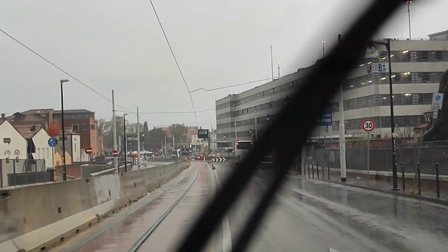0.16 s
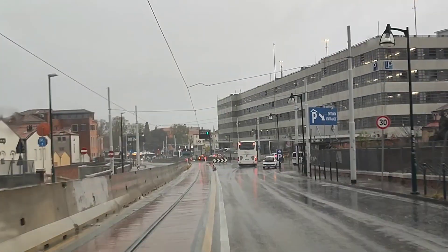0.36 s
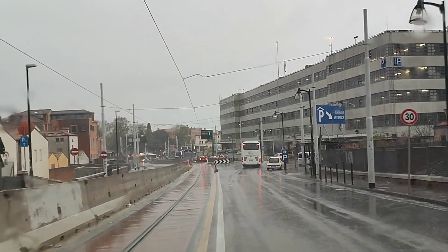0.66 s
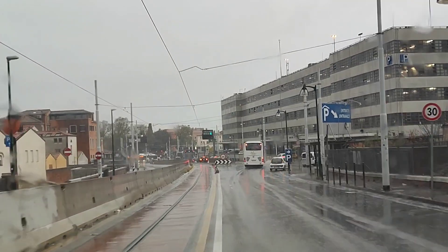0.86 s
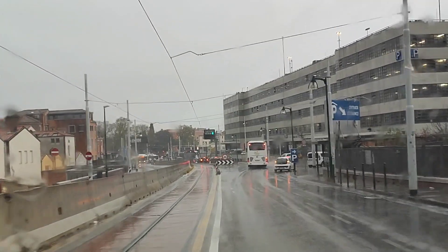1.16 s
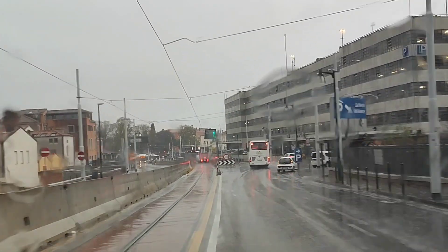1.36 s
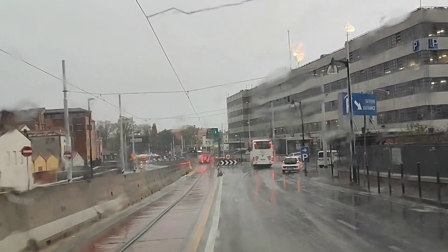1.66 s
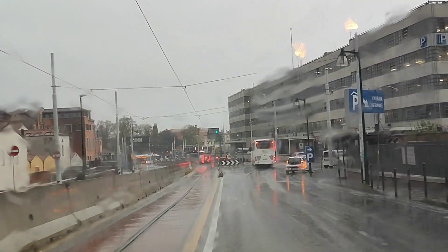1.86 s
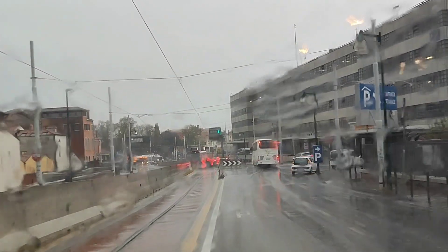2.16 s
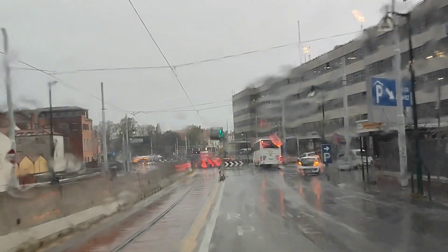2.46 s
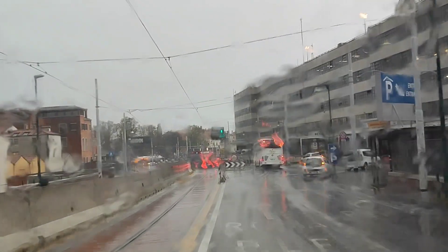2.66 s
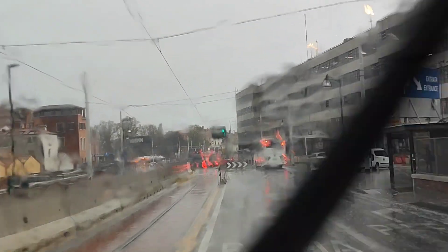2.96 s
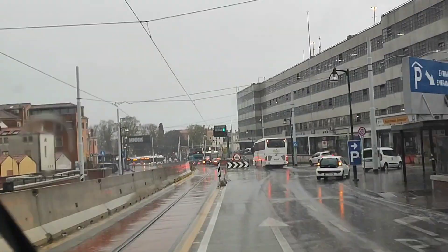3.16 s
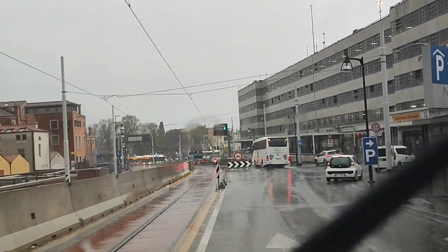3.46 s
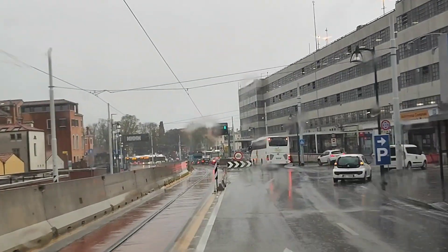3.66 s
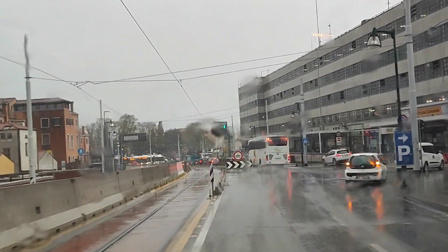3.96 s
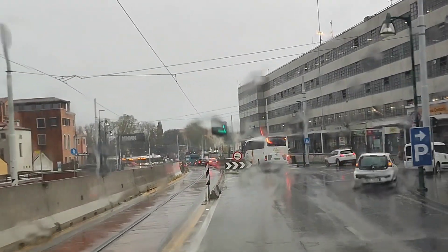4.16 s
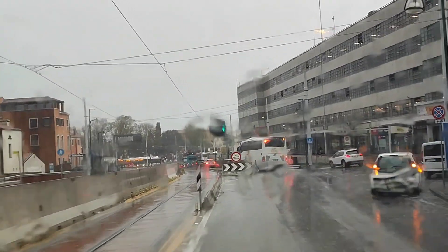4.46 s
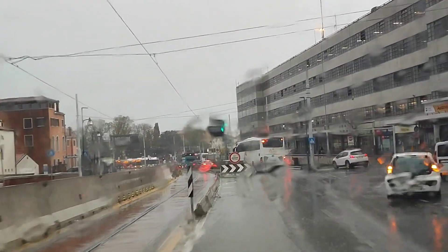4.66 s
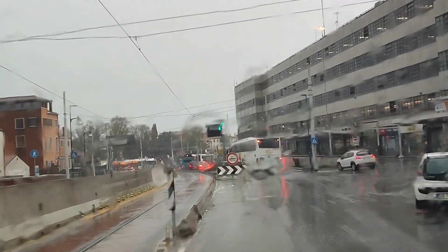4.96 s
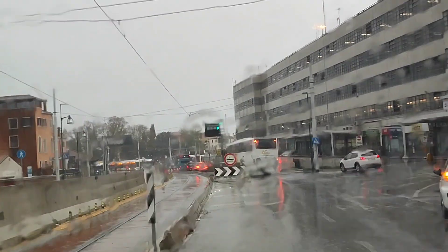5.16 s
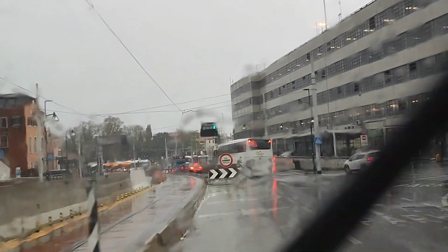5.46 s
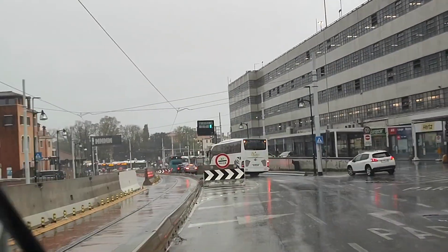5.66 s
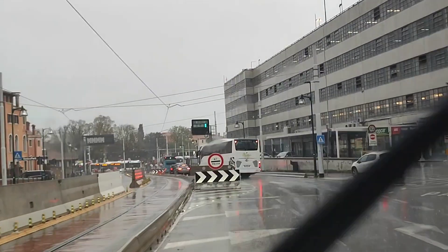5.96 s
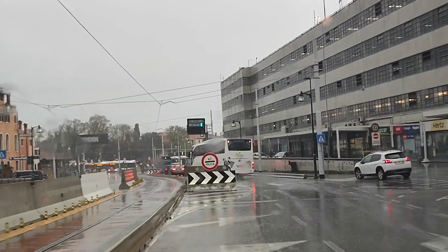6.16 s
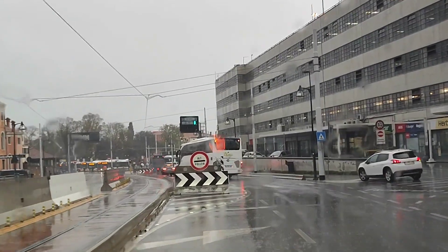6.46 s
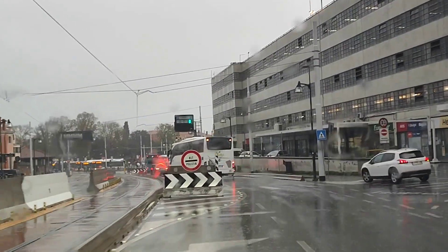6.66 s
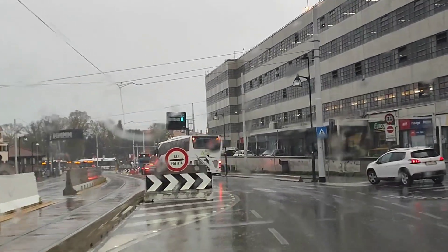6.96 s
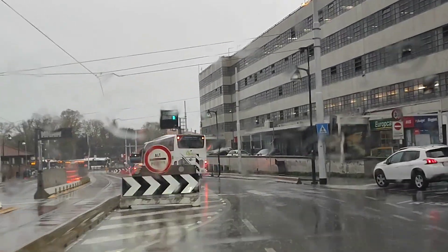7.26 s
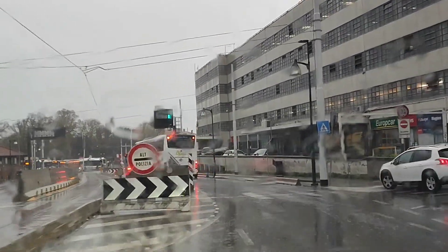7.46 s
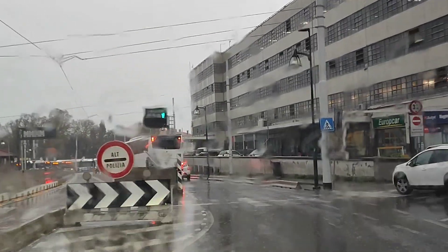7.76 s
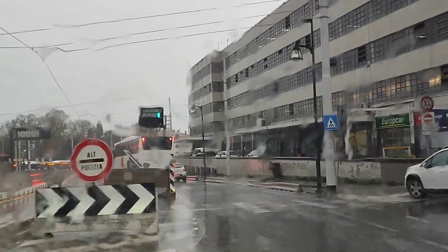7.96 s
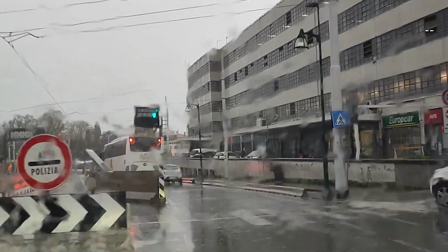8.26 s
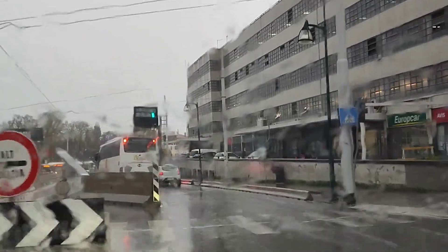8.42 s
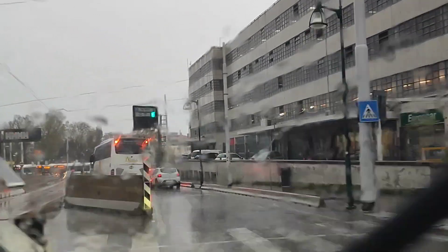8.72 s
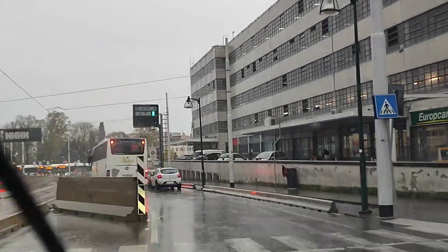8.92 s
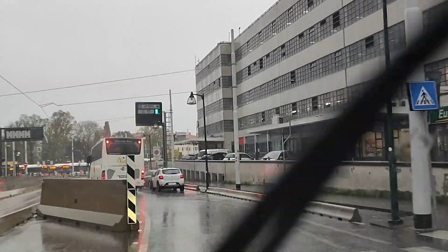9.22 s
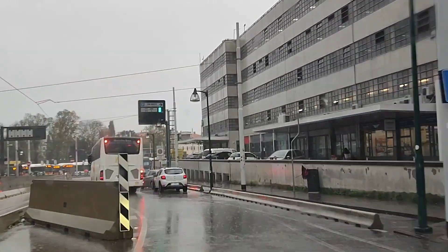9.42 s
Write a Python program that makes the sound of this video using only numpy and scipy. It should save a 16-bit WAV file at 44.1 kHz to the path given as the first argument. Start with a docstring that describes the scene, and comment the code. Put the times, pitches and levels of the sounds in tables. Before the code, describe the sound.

From inside a car rolling slowly through a downpour, sheets of drops tick sharply on the windscreen. Heavy drops crack out in quick clusters, loudest a little to the left about three seconds in; after the midpoint the patter turns lighter and comes in waves. The wipers swish softly a few times, and muffled rain on the roof and a quiet tyre and engine rumble stay beneath.

```python
"""Inside a slowly moving car, with heavy rain on the windscreen.
Sheets of drops tick on the glass, which rings most strongly near 3 kHz; fat drops snap out singly
and in short volleys. Harder rain makes the patter louder, sharper and slightly denser.
Under it lie dull taps and a wash of rain on the bodywork, soft wiper strokes,
a low road rumble and a faint hiss."""
import sys
import numpy as np
from scipy import signal
from scipy.fft import rfft, irfft, next_fast_len
from scipy.io import wavfile
from scipy.ndimage import map_coordinates

SR = 44100
rng = np.random.default_rng(int(sys.argv[2]) if len(sys.argv) > 2 else 0)


def master_out(mix):
    """Clip the mix to full scale and print it as 16-bit PCM to the path in sys.argv[1]."""
    frames = np.transpose(np.atleast_2d(mix))
    ceiling = np.clip(frames, -1, 1)
    pcm = np.round(ceiling * 32767).astype(np.int16)
    wavfile.write(sys.argv[1], SR, pcm)


N = 422919

# The tone of a drop heard through the glass. Each row: frequency in Hz, relative level in dB.
GLASS_TONE = [(40, -87), (200, -59), (700, -30.5), (1400, -21), (2000, -12), (2500, -5), (2800, 0.5),
              (3050, 4.5), (3300, 0), (3560, -1), (3830, -5.5), (4350, -7.5), (5100, -16), (5900, -17.5),
              (6800, -24), (7700, -34.5), (9000, -36), (10500, -44.5), (12000, -47.5), (16000, -53)]
RING_HZ, RING_HALF_WIDTH_HZ = 3000, 350  # where the glass rings most strongly


def windscreen():
    """Thicker sheets of rain are louder, denser and sharper; the finest spray merges into a hiss."""
    # How hard the rain hits. Each row: time in seconds, strength in dB.
    rain_strength = [(0.0, -37), (0.18, -37), (0.3, -40), (0.39, -37), (0.46, -31.5), (0.68, -33.5),
                     (0.77, -35), (0.86, -36), (1.0, -31.5), (1.4, -31), (1.7, -33.5), (1.88, -34),
                     (1.96, -36.5), (2.06, -40), (2.18, -34.5), (2.48, -34.5), (2.6, -32), (2.77, -33.5),
                     (2.88, -35), (2.96, -30.5), (3.2, -34), (3.42, -35), (3.56, -37), (3.72, -37),
                     (3.86, -32), (4.2, -32.5), (4.31, -32.5), (4.38, -31), (4.52, -37.5), (4.62, -38),
                     (4.72, -41.5), (5.2, -42), (5.34, -39), (5.42, -36.5), (5.56, -33), (5.7, -36.5),
                     (5.9, -40.5), (6.08, -35), (6.22, -38.5), (6.32, -35.5), (6.45, -38), (6.51, -39.5),
                     (6.82, -44.5), (6.92, -40.5), (7.1, -35), (7.22, -39), (7.6, -34), (7.9, -40),
                     (8.02, -39), (8.32, -36.5), (8.47, -39.5), (8.58, -43.5), (8.68, -38.5), (8.76, -37),
                     (8.9, -41), (9.18, -36.5), (9.42, -36.5), (9.58, -35)]
    drops_per_s, flurries_per_s = 1700, 12
    rain_db, = curves(rain_strength)
    swell_db = rain_db - rain_db.mean()
    density = amp(0.05 * swell_db)
    ticks = patter(rate=drops_per_s * density, scatter_db=5.5, spread_db=15.5, largest=1.84)
    ticks = unit(ticks / np.sqrt(density))  # extra drops alone add no loudness
    ticks = unit(ticks + amp(-10) * cabin_noise(GLASS_TONE))  # add the fine spray
    # chance flurries nudge the treble, the side and the level
    treble_db = -2.1 + 0.38 * swell_db + 0.83 * wobble(flurries_per_s)
    pan_db = 0.85 + 0.8 * wobble(flurries_per_s)
    level_db = rain_db - 2.5 + 0.05 * wobble(flurries_per_s)
    ticks = ticks + (amp(treble_db) - 1) * filtered(ticks, treble)
    return ticks * amp(level_db) * sides(pan_db)


def patter(rate, scatter_db, spread_db, largest, spots=48):
    """Drops of random size, rate a second, land on many spots that each ring their own way."""
    glass = np.zeros((2, N))
    for place in np.linspace(-1, 1, spots):
        ring = impact(edge_db=0.5, cabin_db=0.5, cabin_fade_s=0.041, bright_db=rng.normal(-0.9, 6.0),
                      ring_hz=RING_HZ * np.exp(0.02 * rng.standard_normal()), ring_db=0)
        lands = rng.random(N) < rate / (spots * SR)
        sizes = np.minimum(rng.standard_normal(N)[lands], largest)  # bigger drops break up
        hits = np.zeros(N)
        hits[lands] = amp(scatter_db * sizes)
        glass += signal.oaconvolve(hits[None], unit(ring) * sides(spread_db * place), axes=1)[:, :N]
    return unit(glass)


def impact(edge_db, cabin_db, cabin_fade_s, bright_db, ring_hz, ring_db, size=4096):
    """One drop bends the glass: a wave runs out and bounces off the frame, then the cabin echoes."""
    t, hz = np.arange(size) / SR, np.fft.rfftfreq(size, 1 / SR)
    # higher waves run faster, matching sound in air (343 m/s) at the ring of the glass
    radians_per_m = 2 * np.pi * np.sqrt(hz * RING_HZ) / 343
    wave = lambda near_m, far_m: np.exp(-1j * radians_per_m * rng.uniform(near_m, far_m, (2, 1)))
    bending = wave(0.2, 0.5) + amp(edge_db) * (wave(0.5, 0.9) + wave(0.8, 1.5) / 2)
    echoes = rng.standard_normal((2, size)) * amp(-60 * t / cabin_fade_s) * (1 - np.exp(-t / 0.0016))
    # each spot rings a little higher or lower, and longer under a heavy drop
    tone_db = along(GLASS_TONE, hz * RING_HZ / ring_hz)
    tone_db += bright_db * treble(hz, low_hz=4740, high_hz=7250)
    tone_db += ring_db * ring_band(hz, ring_hz)
    spectrum = (bending + amp(cabin_db) * unit(rfft(echoes))) * struck_filter(tone_db)
    return irfft(spectrum) * (1 - t / t[-1])


def fat_drops():
    """Single heavy drops snap on the glass, each with its own ring and hardness."""
    # Each row: start in seconds, level in dB, left over right in dB,
    # treble share in dB before the extra crack, ring in Hz.
    drops = [(0.14, -30, 2, -16, 3030), (0.43, -30, -2, -16, 3000), (0.435, -26, -3, -13, 2910),
             (0.458, -28, 0, -16, 3160), (0.504, -21, 4, -14, 3030), (0.517, -25, 2, -11, 3100),
             (0.566, -27, 1, -15, 3060), (0.589, -26, -2, -13, 3050), (0.598, -28, 3, -14, 3110),
             (0.647, -21, -5, -16, 3100), (0.703, -30, -13, -21, 3330), (0.79, -27, 0, -18, 3020),
             (0.816, -32, 5, -18, 3230), (0.89, -23, -5, -17, 2970), (0.982, -26, 5, -12, 3130),
             (1.044, -25, 4, -11, 3080), (1.175, -26, 4, -16, 3100), (1.215, -27, 4, -20, 3080),
             (1.275, -27, 1, -15, 3090), (1.806, -29, -8, -16, 2920), (1.871, -29, 4, -16, 3030),
             (1.935, -28, 0, -23, 3080), (2.09, -29, -1, -15, 3060), (2.101, -33, -4, -19, 3080),
             (2.125, -29, -3, -26, 2860), (2.151, -27, 2, -17, 3040), (2.282, -28, 4, -25, 2960),
             (2.374, -25, 6, -21, 3380), (2.48, -29, 14, -22, 3160), (2.506, -24, 9, -10, 3080),
             (2.525, -21, 9, -20, 3010), (2.561, -20, 8, -8, 2970), (2.578, -19, 11, -13, 3110),
             (2.59, -18, 9, -16, 3080), (2.625, -25, 18, -14, 3150), (2.639, -32, 13, -3, 2860),
             (2.648, -22, 14, -17, 3180), (2.677, -16, 14, -20, 3260), (2.809, -24, 8, -18, 3080),
             (2.828, -27, 11, -12, 3030), (2.84, -27, 12, -21, 3200), (2.847, -19, 9, -21, 3190),
             (2.952, -22, 11, -27, 2980), (2.958, -24, 10, -15, 3090), (2.996, -18, 13, -7, 3110),
             (3.017, -21, 11, -19, 3150), (3.038, -26, 9, -20, 3120), (3.051, -22, 10, -18, 3000),
             (3.121, -25, 11, -19, 2960), (3.645, -32, 14, -29, 2980), (3.698, -28, -5, -20, 3070),
             (3.78, -29, 11, -22, 3020), (4.017, -26, -5, -19, 2980), (4.025, -28, 7, -14, 3100),
             (4.139, -22, 8, -13, 3040), (4.156, -22, 11, -14, 3020), (4.211, -25, 10, -14, 2840),
             (4.336, -28, 10, -17, 3450), (4.365, -25, 8, -20, 3200), (4.391, -30, 5, -20, 3060),
             (4.66, -34, 12, -15, 2940), (4.736, -38, 5, -23, 3020), (4.769, -36, -11, -22, 2950),
             (4.845, -35, -8, -26, 2930), (4.904, -37, -1, -17, 3140), (5.361, -36, 7, -15, 2940),
             (5.417, -29, 11, -18, 3190), (5.571, -33, 5, -18, 3170), (5.661, -30, 12, -22, 3180),
             (5.723, -30, 4, -15, 3080), (5.802, -34, 5, -10, 3040), (5.845, -34, 3, -19, 2950),
             (5.954, -31, 8, -15, 3120), (6.299, -28, 1, -18, 3160), (6.42, -34, -2, -17, 2950),
             (6.471, -25, 24, -21, 3240), (6.866, -37, -14, -23, 3000), (6.87, -37, -18, -23, 3010),
             (6.905, -34, -3, -27, 3030), (6.965, -33, -3, -23, 3010), (6.982, -34, 2, -29, 3030),
             (7.175, -30, 3, -22, 3050), (7.288, -32, -8, -27, 3000), (7.372, -32, 2, -19, 3090),
             (7.466, -30, 8, -18, 3060), (7.507, -30, -4, -20, 2970), (7.806, -33, -11, -22, 3050),
             (7.892, -35, 4, -19, 3230), (8.012, -35, -3, -18, 3000), (8.082, -32, -3, -24, 3010),
             (8.175, -32, 0, -14, 3310), (8.227, -30, 4, -22, 2980), (8.416, -35, -4, -19, 3100),
             (8.648, -35, 0, -23, 3070), (8.694, -33, -7, -17, 3000), (8.748, -40, -4, -7, 3160),
             (8.764, -26, 0, -13, 3030), (8.78, -32, -1, -15, 3000), (8.83, -33, 4, -23, 3070),
             (8.85, -35, -1, -25, 2930), (8.885, -34, 4, -23, 3040), (8.941, -34, 2, -23, 3080),
             (9.134, -33, 11, -6, 3070), (9.15, -34, 2, -25, 3040), (9.169, -32, -1, -21, 3080)]
    snap_s, crack_db, contact_hz = 0.0013, 0.95, 2090
    out = np.zeros((2, N + SR))
    for start, db, pan_db, treble_db, ring_hz in drops:
        plain = impact(edge_db=-8, cabin_db=-6, cabin_fade_s=0.028, bright_db=0,
                       ring_hz=ring_hz, ring_db=5.5)
        snap = np.array([hardened(ear, treble_db + crack_db) for ear in plain])
        strength = np.sqrt(np.sum(snap ** 2, axis=1, keepdims=True) / (snap_s * SR))
        out[:, round(start * SR):][:, :snap.shape[1]] += amp(db) * sides(pan_db) * snap / strength
    # a small hard contact makes few low tones
    return filtered(out[:, :N], lambda hz: -hz ** 2 / (contact_hz ** 2 + 1j * contact_hz * hz - hz ** 2))


def hardened(plain, treble_db):
    """A hard hit is bright, a soft one dull: move the treble's share of a drop towards treble_db."""
    spectrum = rfft(plain)
    hz = np.linspace(0, SR / 2, len(spectrum))
    for _ in range(3):
        power = np.abs(spectrum) ** 2
        lift_db = treble_db - 10 * np.log10(np.sum(power[hz > 4800]) / np.sum(power))
        spectrum = spectrum * struck_filter(lift_db * treble(hz, low_hz=4200, high_hz=10500))
    return irfft(spectrum)


def volleys():
    """Short bursts of heavy drops rattle on one part of the glass at a time."""
    # Each row: start in seconds, length in seconds, level in dB, left over right in dB,
    # treble lift in dB.
    bursts = [(0.43, 0.16, -39, -2, 5.5), (0.642, 0.048, -40, -8, 2), (0.945, 0.14, -46, 0, 12),
              (1.343, 0.35, -39, 1, -1), (2.592, 0.114, -37, 4, 9), (2.807, 0.058, -37.5, 8, 6),
              (2.93, 0.178, -39.5, 7, 4.5), (4.09, 0.12, -37.5, 5.5, 3), (4.345, 0.055, -36.5, 12, 5),
              (5.394, 0.052, -41, 8, -9), (5.71, 0.1, -46, 7, 7.5), (6.273, 0.22, -42.5, -3.5, 2),
              (7.458, 0.27, -46, -5, 4), (8.744, 0.057, -43, -5, -5), (9.11, 0.066, -40.5, 0, -1)]
    t, edge_s = np.arange(N) / SR, 0.011
    rattle = patter(rate=480, scatter_db=2.0, spread_db=1.0, largest=2.5, spots=24)
    snap = filtered(rattle, treble)
    out = np.zeros((2, N))
    for start, length, db, pan_db, treble_db in bursts:
        fade = np.clip(np.minimum(t - start, start + length - t) / edge_s + 0.5, 0, 1)
        out += amp(db) * sides(pan_db) * fade * (rattle + (amp(treble_db) - 1) * snap)
    return out


def near_pane(glass):
    """The pane sends some pitches left, others right; a little of its ring crosses over upside down."""
    # Each row: frequency in Hz, left over right in dB.
    lean = [(2000, 0.5), (2700, 1.5), (3050, 0.6), (3700, -1), (4400, 3), (5000, -3), (5800, 3), (7000, -1)]
    left, right = filtered(glass, lambda hz: amp(along(lean, hz) * np.array([[1], [-1]]) / 2))
    crossed_ring = filtered(np.array([right, left]), ring_band)
    return np.array([left, right]) - 0.086 * crossed_ring


def roof_taps(size=4096):
    """Heavy drops on the lined roof give short, dull taps."""
    # Each row: start in seconds, level in dB before the boost, left over right in dB.
    taps = [(0.647, -52, 0), (3.699, -54, -2), (3.878, -53, 4), (3.906, -55, -6), (6.084, -64, -1),
            (6.446, -52, 5), (6.936, -59, 1), (7.176, -52, 0), (7.31, -56.5, 0), (8.013, -55.5, 1)]
    # A tap through the lining. Each row: frequency in Hz, relative level in dB.
    tap_tone = [(40, -60), (200, -30), (500, -11), (1000, -4), (1800, 2.5), (3000, -19), (5000, -36)]
    boost_db, fade_s = 9, 0.034
    out = np.zeros((2, N + SR))
    t, hz = np.arange(size) / SR, np.fft.rfftfreq(size, 1 / SR)
    panel = unit(struck_filter(along(tap_tone, hz)))
    for start, db, pan_db in taps:
        splash = amp(db + boost_db - 60 * t / fade_s) * rng.standard_normal((2, size))
        out[:, round(start * SR):][:, :size] += sides(pan_db) * irfft(rfft(splash) * panel)
    return out[:, :N]


def bodywork():
    """Countless drops on roof and bonnet merge into a dull wash that swells slowly."""
    # Each row: time in seconds, level in dB.
    wash_level = [(0, -53.5), (1.0, -51), (1.7, -47), (2.2, -52), (2.9, -52), (3.7, -53.5), (4.25, -48.5),
                  (4.9, -55), (6.2, -50.5), (6.8, -55), (7.6, -50.5), (8.6, -53), (9.59, -53)]
    # Rain through the lined roof. Each row: frequency in Hz, relative level in dB.
    roof_tone = [(30, -46), (120, -39), (300, -10.5), (550, -4), (850, -0.5), (1300, 5), (2000, 9.5),
                 (3000, 10.5), (5000, -20), (9000, -58), (15000, -39)]
    level_db, = curves(wash_level)
    return amp(level_db + 1.04 * wobble(12)) * cabin_noise(roof_tone)


def wipers():
    """Each stroke pushes water over the glass with a soft swish."""
    # Each row: middle of the stroke in seconds, level in dB.
    strokes = [(0.12, -70), (3.3, -62), (5.6, -56), (8.8, -71.5)]
    # Rubber on wet glass. Each row: frequency in Hz, relative level in dB.
    rubber_tone = [(150, -21), (420, 13), (900, 17), (1600, 24.5), (4000, -60)]
    t, half_stroke_s = np.arange(N) / SR, 0.11
    sweep = sum(amp(db) * np.exp(-((t - middle) / half_stroke_s) ** 2) for middle, db in strokes)
    return sweep * cabin_noise(rubber_tone)


def road():
    """Tyres and engine rumble through the floor, wavering a little."""
    # Each row: time in seconds, level in dB.
    rumble_level = [(0, -74.5), (9.59, -75)]
    # Each row: frequency in Hz, relative level in dB.
    rumble_tone = [(25, -44), (60, -26), (105, -11.5), (125, -9.5), (138, -9), (150, -2), (170, -8.5),
                   (225, 4), (340, 3), (500, 5), (900, -3), (2000, -36)]
    level_db, = curves(rumble_level)
    return amp(level_db + wobble(2.55)) * cabin_noise(rumble_tone) * sides(pan_db=2)


def hiss():
    """A faint steady hiss that remains in the lulls."""
    # Each row: frequency in Hz, relative level in dB.
    hiss_tone = [(2000, -19), (5500, 22), (8000, -18), (11000, -1), (15000, -12)]
    return amp(-71) * cabin_noise(hiss_tone)


def cabin_noise(tone):
    """Stereo noise with the given tone and a level of 1, alike on both sides in the bass."""
    # Each row: frequency in Hz, likeness of the two sides (1 the same, -1 opposite).
    likeness = [(40, .6), (160, 1), (330, 0.81), (520, 0.39), (750, -0.06), (1200, -0.35), (1900, 0.14),
                (2800, 0.41), (5000, 0.38)]

    def colour(hz):
        angle = np.arccos(np.clip(along(likeness, hz), -1, 1)) / 2
        return amp(along(tone, hz)) * [np.cos(angle), np.sin(angle)]
    mid, side = filtered(rng.standard_normal((2, N)), colour)
    return unit(np.array([mid + side, mid - side]))


def ring_band(hz, ring_hz=RING_HZ):
    """1 at the ring of the glass, falling to 0 away from it."""
    return 1 / (1 + ((hz - ring_hz) / RING_HALF_WIDTH_HZ) ** 2)


def treble(hz, low_hz=4300, high_hz=7600):
    """Near 1 in the band of a drop's snap, above the ring of the glass; 0 far outside it."""
    return (1 - 1 / (1 + (hz / low_hz) ** 10)) / (1 + (hz / high_hz) ** 8)


def amp(db):
    """Turn decibels into a gain."""
    return 10 ** (np.asarray(db) / 20)


def unit(x):
    """Scale x to an average (rms) level of 1."""
    return x / np.sqrt(np.mean(np.abs(x) ** 2) + 1e-20)


def along(points, hz):
    """Read between (Hz, value) points on a pitch-like (log) scale."""
    frequencies, values = np.transpose(points)
    return np.interp(np.log(hz + 1), np.log(frequencies), values)


def curves(rows):
    """One value per sample for each column after the time."""
    seconds, *columns = np.transpose(rows)
    return [np.interp(np.arange(N) / SR, seconds, column) for column in columns]


def wobble(rate):
    """A smooth curve through rate random points a second."""
    return map_coordinates(rng.standard_normal(int(N * rate / SR) + 4), [np.arange(N) * rate / SR])


def filtered(x, response):
    """Scale each frequency in x by response(hz)."""
    size = next_fast_len(N + SR // 2)
    return irfft(rfft(x, size) * response(np.fft.rfftfreq(size, 1 / SR)), size)[..., :N]


def struck_filter(gain_db):
    """A filter with these gains that rings after a hit, never before it (minimum phase)."""
    cepstrum = irfft(np.log(amp(gain_db)))
    half = len(cepstrum) // 2
    cepstrum[1:half] *= 2
    cepstrum[half + 1:] = 0
    return np.exp(rfft(cepstrum))


def sides(pan_db):
    """Left and right gains with the same total power; positive pan_db leans left."""
    gains = amp(np.array([pan_db, -pan_db]).reshape(2, -1) / 2)
    return gains / np.sqrt(np.mean(gains ** 2, axis=0))


def scene():
    """Everything heard in the cabin."""
    glass = near_pane(windscreen() + volleys() + fat_drops())
    return glass + roof_taps() + bodywork() + wipers() + road() + hiss()


def record(dry):
    """Cut away the very highest treble."""
    return filtered(dry, lambda hz: hz < 15850)


dry = scene()
out = record(dry)
master_out(out)
```